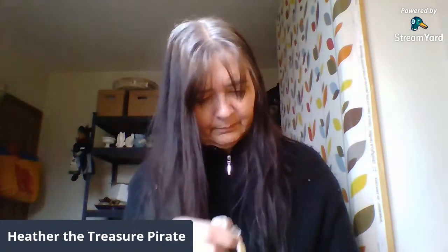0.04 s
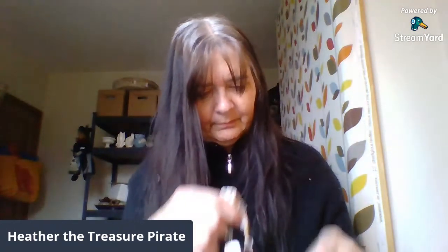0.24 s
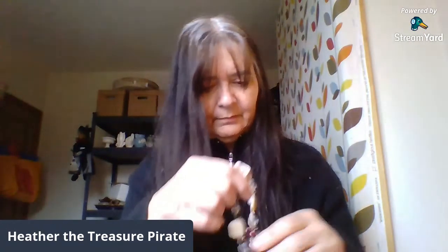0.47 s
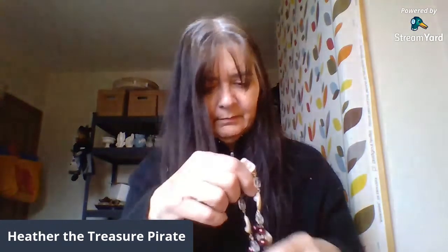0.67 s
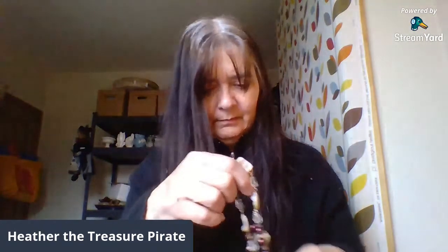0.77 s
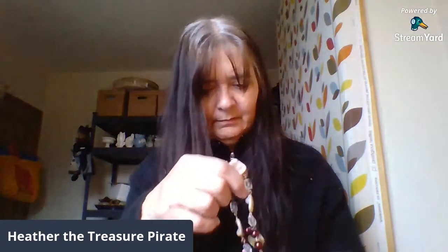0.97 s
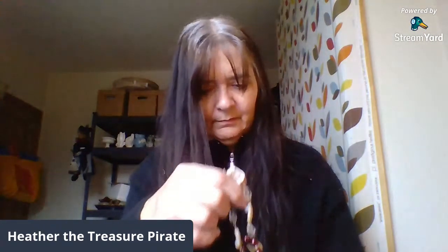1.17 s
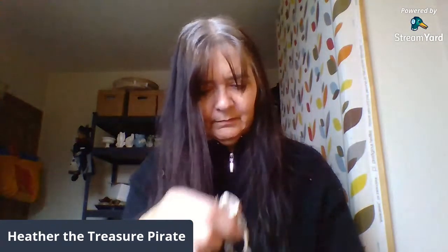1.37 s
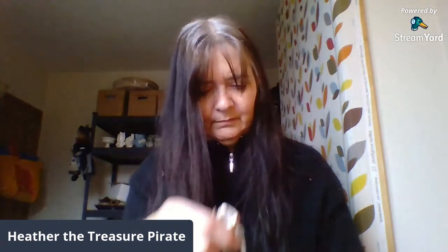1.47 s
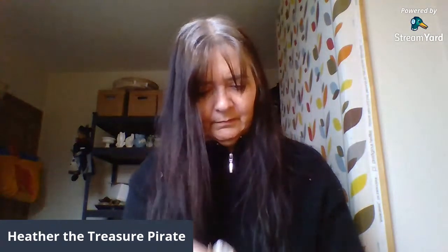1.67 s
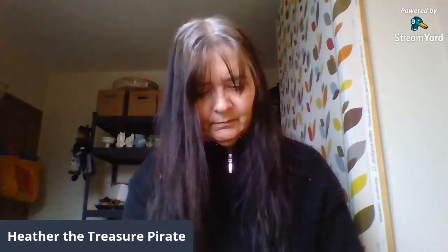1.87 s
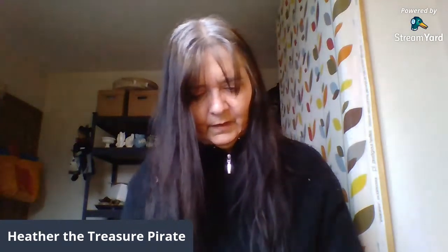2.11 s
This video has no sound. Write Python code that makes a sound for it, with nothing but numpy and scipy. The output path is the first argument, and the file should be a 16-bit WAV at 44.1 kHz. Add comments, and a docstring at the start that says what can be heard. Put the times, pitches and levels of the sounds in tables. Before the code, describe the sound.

Strings of beads clatter on a table, clink lightly, then clatter down again.

```python
"""First comes a clatter: strings of beads knock on a table and rattle over each other as they are
lifted from a heap of costume jewellery. The hanging strand gives a few light clinks, then clatters
down again, and a fine chain jingles near the end. Each touch makes a bead, a link or the table top
ring briefly. The room is small, and is heard through a microphone that loses the highest treble,
with a noise suppressor and soft limiting."""
import sys
import numpy as np
from scipy import signal
from scipy.io import wavfile
from scipy.ndimage import uniform_filter1d

SR = 44100
rng = np.random.default_rng(int(sys.argv[2]) if len(sys.argv) > 2 else 0)


def unload_audio(sound):
    """Save the sound as a 16-bit wav file, at the path given as the first command line argument."""
    columns = np.transpose(np.atleast_2d(sound))
    # keep every value between -1 and 1, then stretch to whole-number steps
    steps = np.round(np.clip(columns, -1, 1) * 32767)
    wavfile.write(sys.argv[1], SR, steps.astype(np.int16))


N = 94550
STRIKE_S = 0.0047  # a contact's level is its strength over this time
LEAD_S = .008  # a contact starts this long before its firm hit


def amp(db):
    """Turns decibels into a number to multiply a sound by."""
    return 10 ** (np.asarray(db) / 20)


def unit(x):
    """Scales a sound to an energy of one."""
    return x / np.sqrt(np.sum(x ** 2) + 1e-20)


def read(points, hz):
    """Looks up a value between a table's rows, on a logarithmic frequency scale."""
    f, value = np.transpose(points)
    return np.interp(np.log(hz + 1), np.log(f + 1), value)


def add(mix, s, sound):
    """Mixes a sound in at s seconds."""
    part = mix[max(round(s * SR), 0):][:len(sound)]
    part += sound[:len(part)]


def colour(x, tone, size=4096):
    """Makes each frequency louder or softer, as a tone table says."""
    log_gain = np.log(amp(read(tone, abs(np.fft.fftfreq(size, 1 / SR)))))
    taps = np.fft.ifft(np.exp(np.conj(signal.hilbert(log_gain)))).real  # no sound ahead of a hit
    return signal.oaconvolve(x, taps[:size // 2])[:N]


def ring(hz, t60, size=1024, rise_s=.00025):
    """One vibration: it builds up during the touch, then fades by 60 dB in t60 seconds."""
    t = np.arange(size) / SR
    return np.sin(2 * np.pi * hz * t) * (1 - np.exp(-t / rise_s)) * np.exp(-np.log(1000) * t / t60)


def body(x, modes, ring_db):
    """Adds an object's modes: the tones it keeps ringing with after a hit."""
    tail = unit(sum(amp(db) * ring(hz, t60, size=6000) for hz, db, t60 in modes))
    return x + amp(ring_db) * signal.oaconvolve(x, tail)[:N]


def contact(hz, t60, overtone_db, spread, bounce, graze_s, settle_s, size=1400, count=5):
    """Light grazes, one firm hit and dying bounces set off a short ring with a few stray tones."""
    t = (np.arange(size) - round(LEAD_S * SR)) / SR
    touches = rng.random(size) < 2000 / SR  # about 2000 a second
    strength, stray = rng.uniform(-1, 1, size), rng.uniform(-1, 1, count)
    fade = np.exp(-abs(t) / np.where(t < 0, graze_s, settle_s))
    hits = bounce * strength * touches * fade
    hits[t == 0] = 1  # the firm hit
    stray_tones = sum(np.sign(u) * ring(min(hz * np.exp(spread * u), SR / 2), t60 / 2) for u in stray)
    tone = unit(ring(hz, t60)) + amp(overtone_db) * unit(stray_tones)
    return unit(signal.fftconvolve(hits, tone)) * np.sqrt(STRIKE_S * SR)


def rattle(times, level_db, low_hz, high_hz, per_s, uneven_db, t60, count=24):
    """Many small random hits, each on a bead or spot with its own pitch."""
    ticks = np.zeros(N)
    for hz in np.geomspace(low_hz, high_hz, count):
        touches = rng.random(N) < per_s / count / SR
        strength = rng.standard_normal(N)
        hits = touches * np.sign(strength) * amp(uneven_db * np.minimum(abs(strength), 2))
        ticks += signal.oaconvolve(hits, unit(ring(hz, t60)))[:N]
    loudness = amp(np.interp(np.arange(N) / SR, times, level_db, left=-120))
    return unit(ticks) * np.sqrt(N) * loudness


def scrape(times, level_db):
    """Beads slide over each other: a fine, dense sizzle with a thin edge of top treble."""
    sizzle = rattle(times, level_db, 6500, 11000, per_s=6000, uneven_db=3, t60=.003, count=8)
    edge = rattle(times, level_db, 11000, 18000, per_s=6000, uneven_db=2, t60=.002, count=6)
    return sizzle + edge


def thump(t60, size=2048):
    """The knocked table gives a dull shudder that dies quickly."""
    t = np.arange(size) / SR
    burst = rng.standard_normal(size) * amp(-60 * t / t60)
    shudder = signal.lfilter(*signal.butter(2, 450, fs=SR), burst)  # keeps the bass, below 450 Hz
    return unit(shudder) * np.sqrt(STRIKE_S * SR)


def knocks():
    """Each bead that lands sounds the table top, the bead itself and a low thump."""
    # Beads landing: (time [s], table level [dB], table pitch [Hz], bead level [dB], bead pitch [Hz],
    # thump level [dB]); levels compare rows within a column
    landings = [(0.005, -30, 1190, -29, 2890, -45), (0.019, -32, 1160, -15.5, 3540, -63),
                (0.028, -12, 1160, -21, 2800, -41.5), (0.031, -16, 1270, -23, 3030, -62.5),
                (0.036, -19.5, 1200, -17.5, 2990, -46), (0.043, -10.5, 1620, -18.5, 3540, -66),
                (0.047, -20.5, 790, -33.5, 3000, -69), (0.057, -13, 1150, -44, 3510, -54),
                (0.0875, -10, 1510, -15, 3630, -43), (0.095, -30, 1720, -35, 3190, -46),
                (0.116, -18, 1510, -34, 3500, -41), (0.123, -17, 1240, -27, 4490, -59),
                (0.146, -26.5, 1960, -30, 2670, -45), (0.189, -21.5, 1730, -22, 4100, -49.5),
                (0.1998, -21.5, 1530, -18, 2990, -55), (0.209, -38, 1190, -16.5, 3040, -56),
                (0.238, -11, 1730, -16.5, 4480, -54.5), (0.2453, -13, 1100, -15.5, 2990, -48),
                (0.249, -8.5, 810, -18, 3110, -55), (0.253, -9, 1650, -24, 2800, -44.5),
                (0.264, -14, 1190, -28, 3460, -52), (0.276, -17, 1520, -24.5, 3330, -56.5),
                (0.281, -16, 1420, -26.5, 3260, -49.5), (0.299, -21.5, 1680, -34, 3330, -55),
                (0.303, -15.5, 1500, -33, 2790, -55), (0.31, -17, 1270, -37, 2800, -55),
                (0.325, -20.5, 1580, -41, 2670, -66), (0.3416, -14.5, 1590, -13.5, 4170, -43),
                (0.346, -13, 1690, -33, 4350, -28.5), (0.3543, -19, 1570, -11, 2630, -24.5),
                (0.364, -11, 1090, -9, 2940, -36), (0.3678, -10, 1520, -21, 2830, -31),
                (0.372, -5.5, 730, -15.5, 2800, -25), (0.385, -23.5, 640, -25, 3780, -35),
                (0.419, -18, 740, -20.5, 2960, -51), (0.4265, -15, 780, -27.5, 3550, -38),
                (0.44, -23, 760, -32.5, 2870, -49), (0.4926, -29, 720, -35, 3720, -66),
                (0.508, -31.5, 710, -40.5, 5040, -73), (0.543, -33, 750, -37, 2750, -66),
                (0.68, -32, 1830, -27.5, 2560, -67), (0.695, -31, 1720, -33.5, 2600, -71.5),
                (1.3636, -29.5, 1290, -40, 6180, -59.5), (1.369, -22, 1860, -22, 2850, -56.5),
                (1.4134, -26.5, 850, -22.5, 2800, -53), (1.436, -20, 1580, -19, 2680, -45),
                (1.445, -14.5, 1490, -20, 2840, -29.5), (1.4946, -26, 890, -16, 4910, -37),
                (1.498, -22, 850, -18.5, 5230, -60), (1.517, -48, 1310, -26, 4750, -44),
                (1.523, -20, 730, -22.5, 2620, -48), (1.532, -16.5, 700, -37, 2760, -54),
                (1.5529, -18.5, 890, -22, 2980, -45), (1.558, -28, 1510, -25, 4760, -48.5),
                (1.607, -22, 730, -21, 2830, -50), (1.63, -17, 780, -14, 3510, -38),
                (1.6394, -19, 1210, -12.5, 4980, -31), (1.65, -37.5, 1180, -33.5, 3750, -27.5),
                (1.6686, -12, 1350, -16, 3110, -44), (1.6734, -6.5, 750, -18, 4910, -35.5),
                (1.68, -24.5, 800, -25, 3620, -36), (1.714, -42.5, 640, -41, 6240, -54),
                (2.011, -30.5, 1710, -28.5, 4960, -57), (2.017, -31.5, 800, -46, 4990, -57.5),
                (2.122, -53.5, 1380, -49.5, 6730, -65)]
    table, bead, low = np.zeros((3, N))
    for s, table_db, table_hz, bead_db, bead_hz, thump_db in landings:
        knock = contact(table_hz, t60=.008, overtone_db=-1.5, spread=.78,
                        bounce=.69, graze_s=.0016, settle_s=.005)
        click = contact(bead_hz, t60=.0052, overtone_db=2, spread=.6,
                        bounce=1.1, graze_s=.0022, settle_s=.004)
        add(table, s - LEAD_S, amp(table_db) * knock)
        add(bead, s - LEAD_S, amp(bead_db) * click)
        add(low, s, amp(thump_db) * thump(t60=.055))
    return amp(-1) * table, amp(-2.5) * bead, amp(1) * low


def table_and_heap(table, bead, low):
    """The table and the heap of beads ring on after each hit and give it their own tone."""
    # Ringing of the table top, the heap and the thump: (pitch [Hz], relative level [dB], fade time [s])
    table_modes = [(602, -11, 0.039), (706, -3.5, .08), (883, 5, 0.029), (1230, -7.5, .06),
                   (1269, -7, 0.18), (1500, -5, .06), (1640, -2.5, 0.097)]
    bead_modes = [(2365, -12, 0.099), (2600, -5.5, 0.02), (2850, -2, 0.071), (3182, -15, .05),
                  (3520, -6, 0.017), (5000, -3.5, 0.019), (5570, -0.5, 0.17), (5970, -8.5, .06),
                  (6300, -5, .05), (6700, -6.5, 0.061)]
    thump_modes = [(123, 0, .3), (215, -3, 0.068), (300, -2, .15)]
    # Tone of the same three: (frequency [Hz], gain [dB])
    table_tone = [(30, -49), (200, -38.5), (420, -14.5), (540, -12), (660, 1.5), (1000, -3.5), (1700, 1.5),
                  (2300, -1.5), (3500, -9.5), (8000, -21.5)]
    bead_tone = [(30, -52.5), (600, -21.5), (1500, -12.5), (2400, -1), (4000, 0.5), (5500, -1), (6800, -2),
                 (9000, 6)]
    thump_tone = [(20, -10.5), (60, -21), (110, -8), (160, -6.5), (210, 4), (310, 1.5), (420, 0.5),
                  (800, -18.5), (3000, -51)]
    return (colour(body(table, table_modes, ring_db=-35), table_tone)
            + colour(body(bead, bead_modes, ring_db=-27.5), bead_tone)
            + colour(body(low, thump_modes, ring_db=-36), thump_tone))


def clinks():
    """Hanging beads touch: two bright tones over a faint, dull clack."""
    # Beads touching: (time [s], first level [dB], first pitch [Hz], second level [dB],
    # second pitch [Hz], clack level [dB])
    touches = [(0.593, -56, 4200, -41.5, 5060, -36.5), (0.599, -47, 4080, -36, 4540, -47),
               (0.6065, -38.5, 4180, -35.5, 4130, -39.5), (0.638, -33, 2530, -35.5, 4680, -42.5),
               (0.647, -35, 2650, -34.5, 4700, -53), (0.657, -57, 2500, -43, 4880, -58),
               (0.671, -37, 2220, -35.5, 4180, -42), (0.7124, -50, 3960, -42, 5060, -51),
               (0.901, -40.5, 2904, -38, 5070, -45.5), (0.933, -38, 3670, -45.5, 6440, -44),
               (1.0997, -39, 2820, -43, 5660, -46.5), (1.106, -48.5, 3010, -45, 5660, -55),
               (1.114, -51, 2960, -49, 5880, -51.5), (1.204, -40, 3840, -36.5, 5460, -67),
               (1.214, -41.5, 2473, -36, 5520, -62.5), (1.354, -58.5, 4030, -41, 6560, -55),
               (1.425, -32, 2863, -31.5, 5420, -44)]
    # Ringing of the hanging strand: (pitch [Hz], relative level [dB], fade time [s])
    strand_modes = [(2365, -5, .09), (2830, -11.5, 0.093), (3182, -12, .05), (3645, -1.5, .05),
                    (5800, -7, 0.043), (5830, -10, .07), (6400, -9, .05), (6700, -15.5, .05)]
    # Tone of the strand: (frequency [Hz], gain [dB])
    strand_tone = [(30, -46.5), (1200, -15), (2300, -1.5), (4000, -3.5), (6500, 2), (7400, 6), (10000, 6.5)]
    clacks, bead = np.zeros((2, N))
    for s, first_db, first_hz, second_db, second_hz, clack_db in touches:
        first = contact(first_hz, t60=.024, overtone_db=-9, spread=.53,
                        bounce=2.1, graze_s=.0023, settle_s=.001)
        second = contact(second_hz, t60=.011, overtone_db=1, spread=.33,
                         bounce=2.1, graze_s=.0025, settle_s=.0019)
        clack = contact(hz=1220, t60=.0063, overtone_db=6, spread=.65,
                        bounce=.8, graze_s=.0028, settle_s=.0035)
        add(bead, s - LEAD_S, amp(first_db) * first + amp(second_db) * second)
        add(clacks, s - LEAD_S, amp(clack_db) * clack)
    return clacks, colour(body(bead, strand_modes, ring_db=-23.5), strand_tone)


def chain():
    """A fine chain slides and its links tick against each other."""
    # The chain sliding: (time [s], level [dB])
    slide = [(1.87, -77.5), (1.9, -53), (1.91, -43.5), (1.942, -43), (1.957, -39.5), (1.985, -63),
             (2.008, -40), (2.03, -72.5)]
    # Links falling together: (time [s], level [dB], pitch [Hz])
    jingle = [(1.886, -45.5, 6560), (1.9056, -32, 6120), (1.9096, -29, 6370), (1.9156, -36.5, 5400),
              (1.926, -37, 5430), (1.9332, -31, 6400), (1.9478, -27, 5080), (1.951, -32, 4960),
              (1.958, -31, 5000), (1.97, -32.5, 4970), (1.978, -51, 4860), (1.991, -31.5, 3660)]
    # Tone of the chain: (frequency [Hz], gain [dB])
    chain_tone = [(30, -51), (2200, -30), (3300, -7), (4700, -4.5), (6600, 0), (7400, 8), (10000, 7),
                  (14000, -5.5)]
    links = rattle(*np.transpose(slide), 2400, 7600, per_s=2200, uneven_db=4.5, t60=.008)
    for s, level_db, hz in jingle:
        tick = contact(hz, t60=.0044, overtone_db=-4.5, spread=.4,
                       bounce=.99, graze_s=.0013, settle_s=.0023)
        add(links, s - LEAD_S, amp(level_db) * tick)
    return colour(links, chain_tone)


def room(x, size=11025):
    """A small furnished room adds faint steady noise and dense echoes whose treble dies first."""
    # Tone of the room's noise: (frequency [Hz], relative level [dB])
    noise_tone = [(20, -22), (70, -12.5), (120, 2), (250, 2), (450, -3), (1500, -7), (3500, -9.5),
                  (6500, -13.5), (9000, -19.5)]
    # How long the echoes last: (frequency [Hz], time to fade by 60 dB [s])
    fade_times = [(100, .2), (500, 0.12), (2000, 0.11), (7000, 0.08)]
    noise = np.sqrt(N) * unit(colour(rng.standard_normal(N), noise_tone))
    t = np.arange(size) / SR
    # About 3000 echoes a second, starting after 3 ms
    echoes = rng.choice([-1., 1.], size) * (rng.random(size) < 3000 / SR) * (t > .003)
    hz, times, bands = signal.stft(echoes, SR, nperseg=256)
    fade = amp(-60 * times / read(fade_times, hz)[:, None])
    tail = signal.istft(bands * fade, SR, nperseg=256)[1]
    return x + amp(-9.5) * signal.oaconvolve(x, unit(tail))[:N] + amp(-67) * noise


def suppress(x, size=256, threshold_db=-50.5, depth_db=-6):
    """The noise suppressor turns down whatever is faint, band by band, which shortens the ringing."""
    frames = dict(nperseg=size, noverlap=size * 3 // 4)
    bands = signal.stft(x, **frames)[2]
    power = size * uniform_filter1d(abs(bands) ** 2, size=3, axis=0)
    faintness = 1 / (1 + abs(power) / amp(threshold_db) ** 2)
    return signal.istft(bands * amp(depth_db * faintness), **frames)[1][:N]


def scene():
    """Beads rattle, knock and clink, and a chain jingles, in a quiet room."""
    # The strand sliding: (time [s], relative level on the table [dB], relative level among beads [dB])
    sliding = [(0, -20, -27.5), (.04, -23, -23.5), (.075, -27.5, -27.5), (.11, -23.5, -36),
               (.168, -35.5, -44.5), (.185, -31.5, -35), (0.202, -19.5, -32), (0.227, -23.5, -31),
               (0.248, -14.5, -23), (.29, -36, -36.5), (0.321, -23, -40.5), (.36, -14, -21),
               (0.391, -34, -29.5), (0.412, -40.5, -38), (0.433, -38, -25.5), (0.464, -59, -59.5),
               (.53, -57, -50), (.555, -39, -42.5), (.583, -51, -48.5), (.61, -54.5, -49),
               (.655, -62.5, -54.5), (.69, -46.5, -46), (.735, -63.5, -60), (.8, -76, -77),
               (.875, -63.5, -67), (0.896, -52.5, -48.5), (.942, -55.5, -43), (.955, -57.5, -62.5),
               (1.069, -64.5, -71.5), (1.28, -71.5, -74.5), (1.341, -56, -61), (1.378, -37.5, -34.5),
               (1.405, -48, -46.5), (1.448, -22.5, -27), (1.482, -38.5, -40), (1.519, -27, -30),
               (1.545, -30, -33), (1.591, -27.5, -32), (1.65, -22, -32.5), (1.689, -49, -39),
               (1.735, -66, -68), (1.81, -80, -74.5), (1.871, -70, -68), (1.95, -59.5, -61),
               (2.015, -51.5, -55.5), (2.059, -77, -71.5), (2.14, -62.5, -58.5)]
    times, table_db, bead_db = np.transpose(sliding)
    table_knocks, bead_clicks, thumps = knocks()
    clacks, strand = clinks()
    table_rattle = rattle(times, table_db, 640, 2100, per_s=1200, uneven_db=4, t60=.01)
    bead_rattle = rattle(times, bead_db, 2300, 6800, per_s=1500, uneven_db=2, t60=.0056)
    table = table_knocks + clacks + amp(-1.5) * table_rattle
    bead = bead_clicks + amp(-2) * bead_rattle
    jewellery = table_and_heap(table, bead, thumps) + strand + chain() + amp(-9) * scrape(times, bead_db)
    return room(jewellery)[None]


def record(dry):
    """Faint sounds are turned down, loud peaks are rounded off and the highest treble is lost."""
    # Tone of the microphone, falling steeply near 7000 Hz: (frequency [Hz], gain [dB])
    mic_tone = [(20, -3), (6700, 1.5), (7100, -8), (7500, -18.5), (8200, -29.5), (8800, -22), (9600, -32.5),
                (12000, -34), (15000, -28)]
    limited = np.tanh(suppress(dry[0]))
    heard = colour(limited, mic_tone)
    treble_cut = signal.firwin(511, 15800, window=("kaiser", 9), fs=SR)  # nothing above 15800 Hz
    return signal.oaconvolve(heard, treble_cut, "same")[None]


dry = scene()
out = record(dry)
unload_audio(out)
```